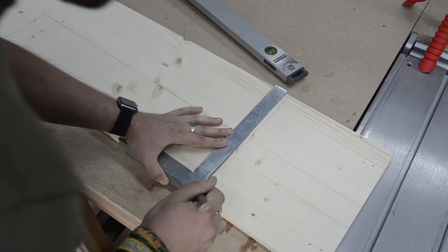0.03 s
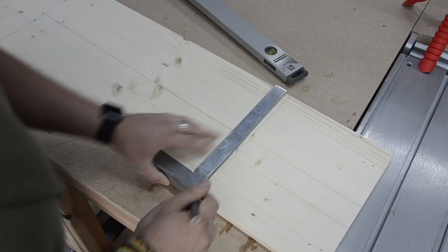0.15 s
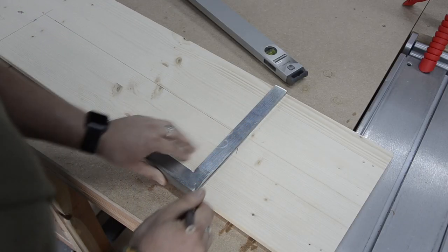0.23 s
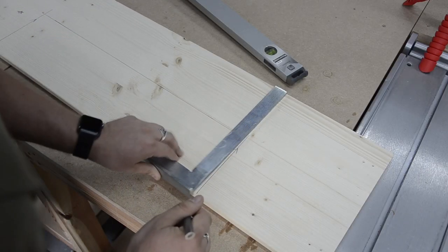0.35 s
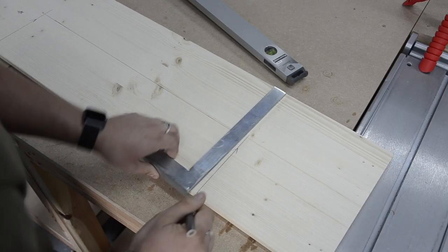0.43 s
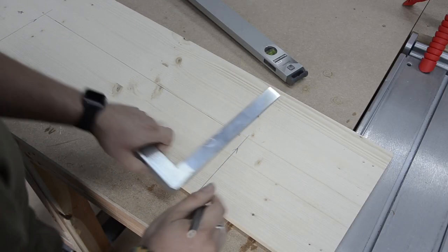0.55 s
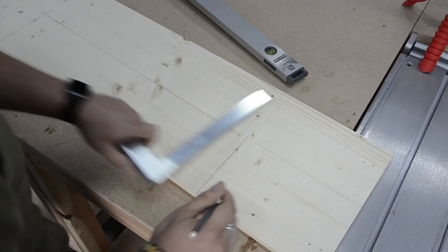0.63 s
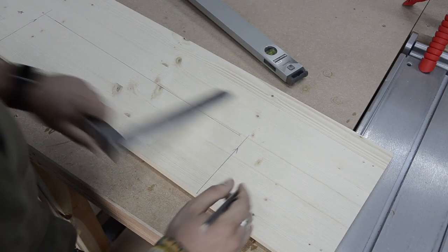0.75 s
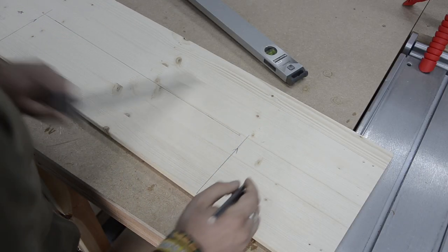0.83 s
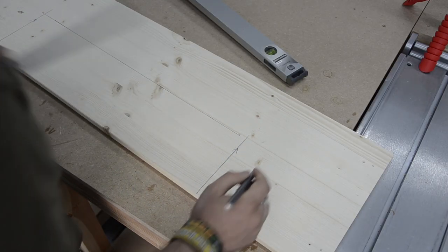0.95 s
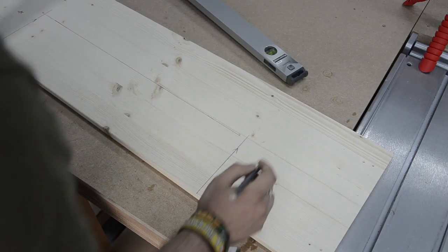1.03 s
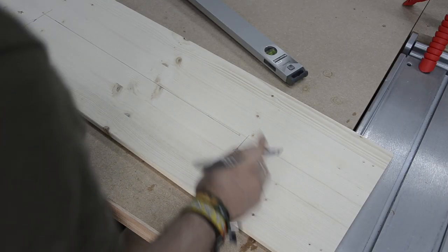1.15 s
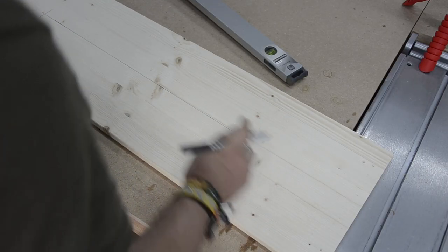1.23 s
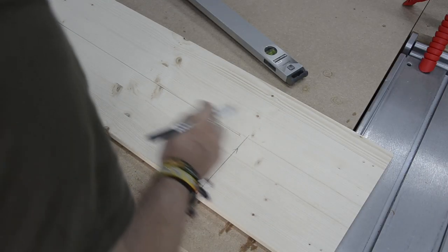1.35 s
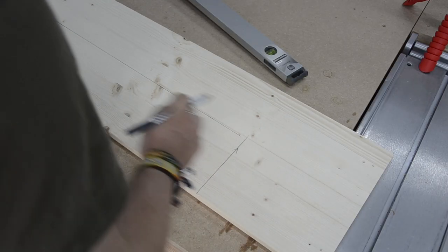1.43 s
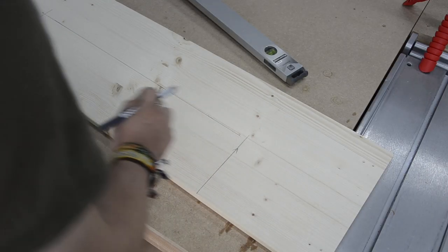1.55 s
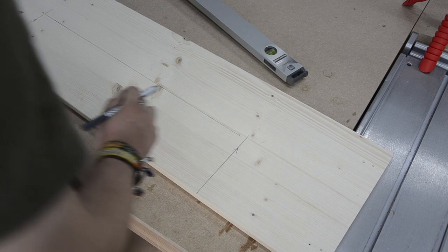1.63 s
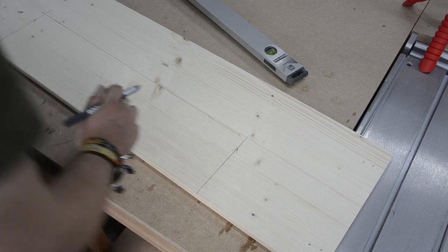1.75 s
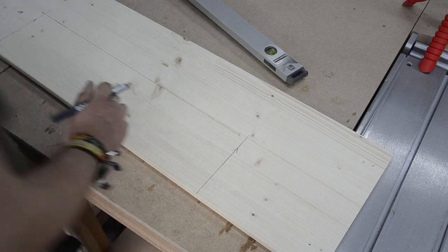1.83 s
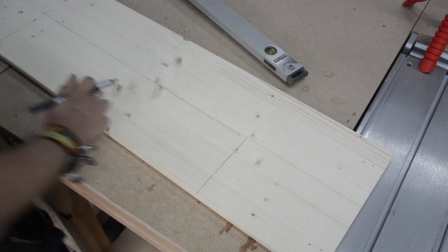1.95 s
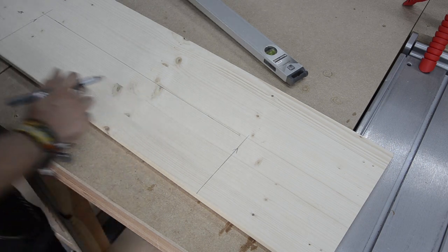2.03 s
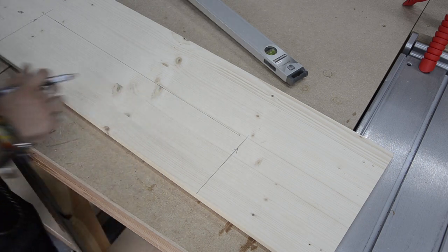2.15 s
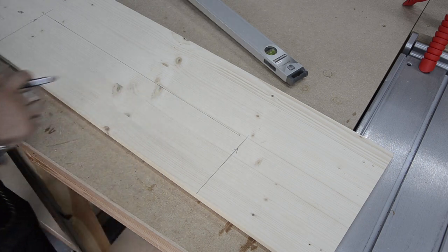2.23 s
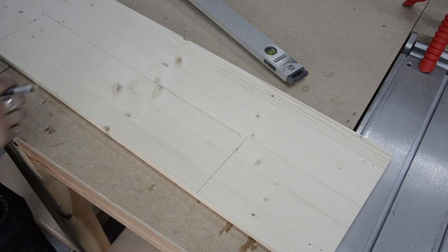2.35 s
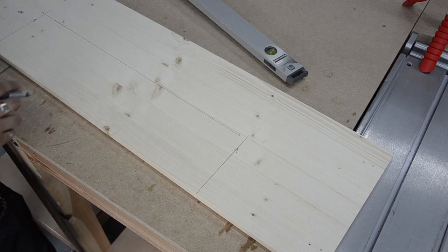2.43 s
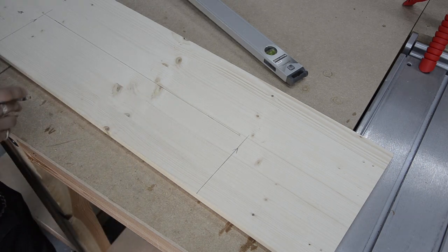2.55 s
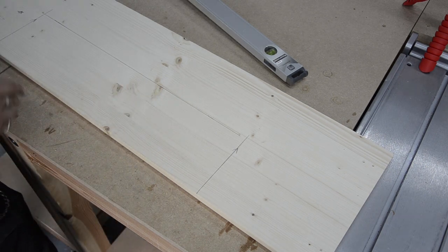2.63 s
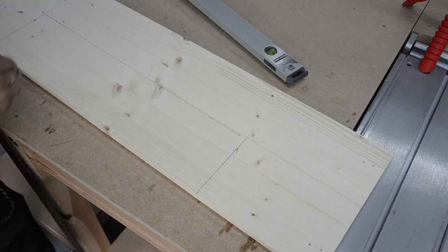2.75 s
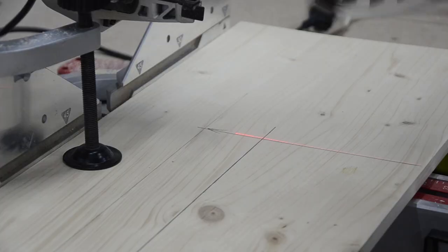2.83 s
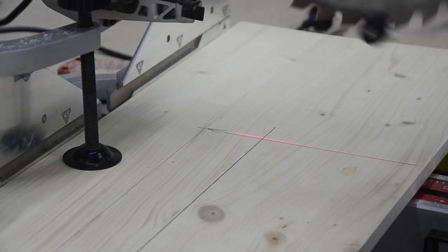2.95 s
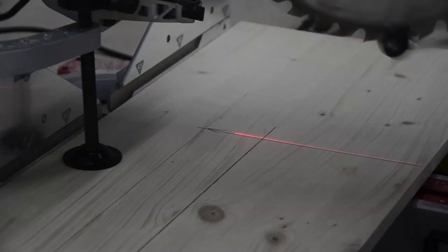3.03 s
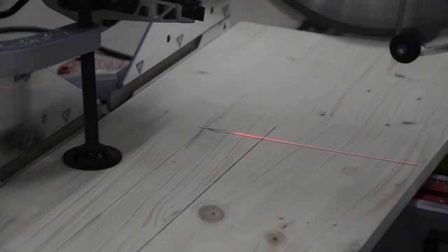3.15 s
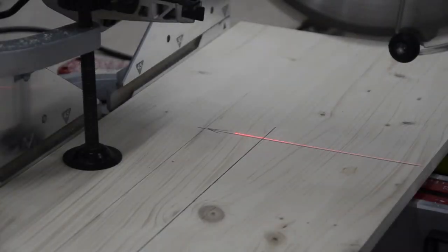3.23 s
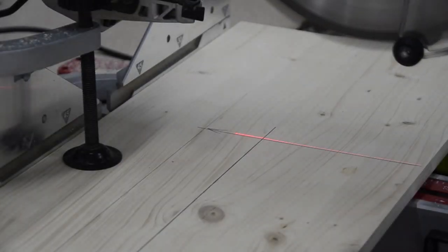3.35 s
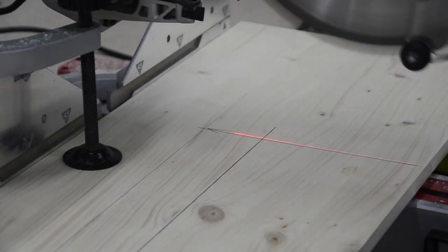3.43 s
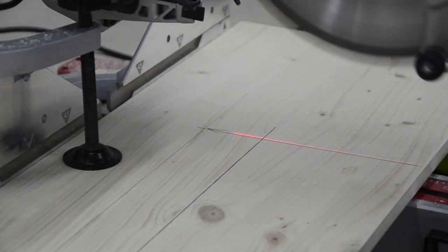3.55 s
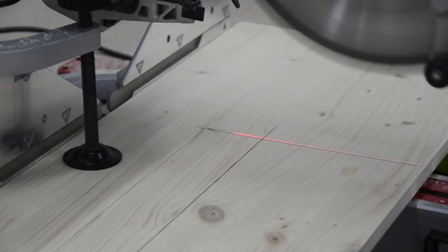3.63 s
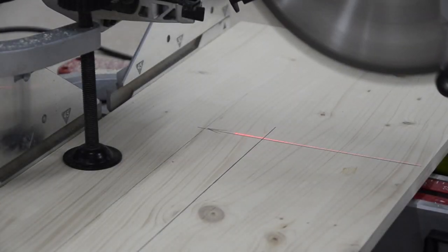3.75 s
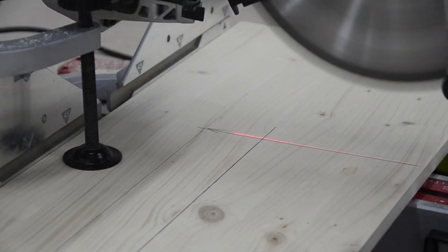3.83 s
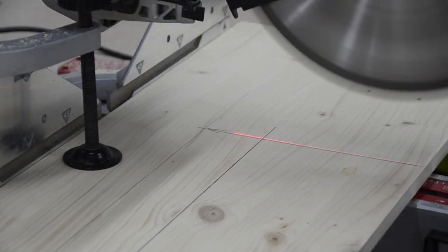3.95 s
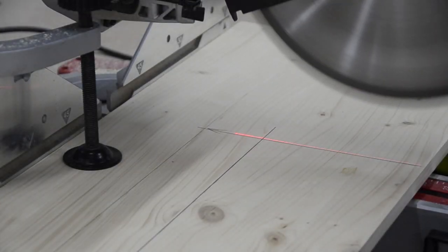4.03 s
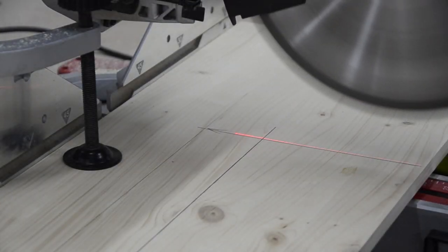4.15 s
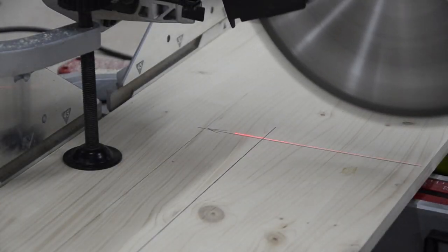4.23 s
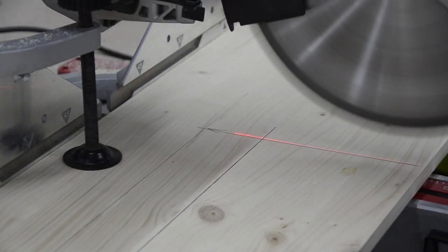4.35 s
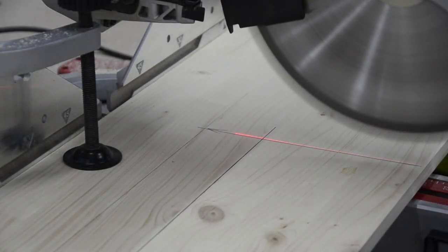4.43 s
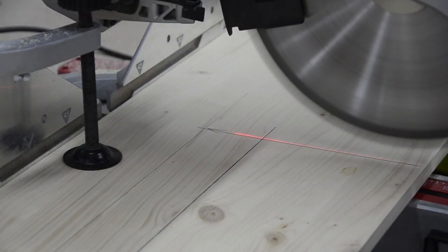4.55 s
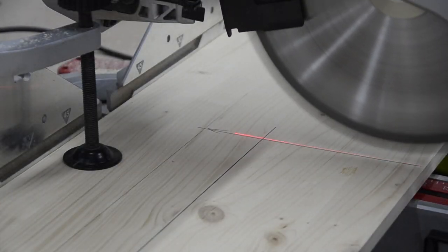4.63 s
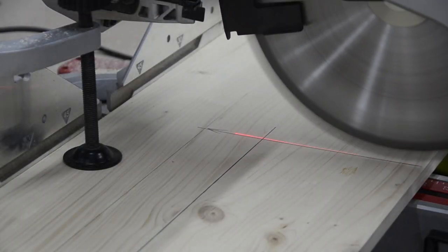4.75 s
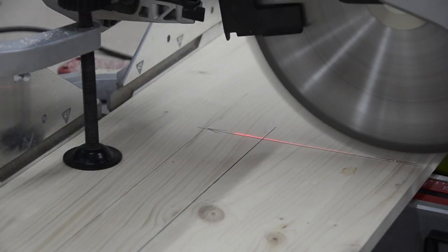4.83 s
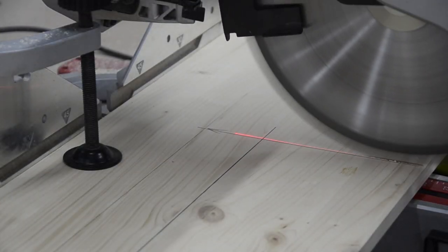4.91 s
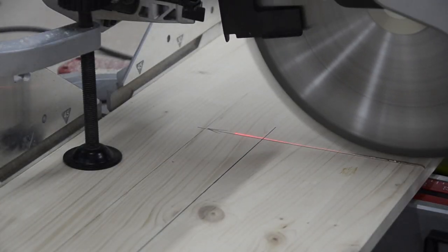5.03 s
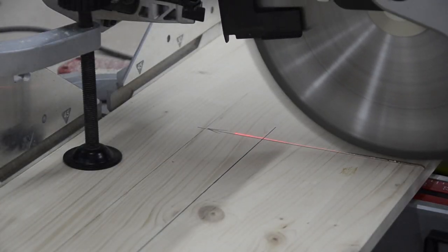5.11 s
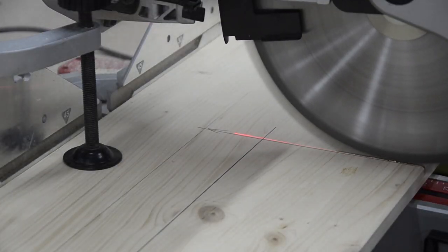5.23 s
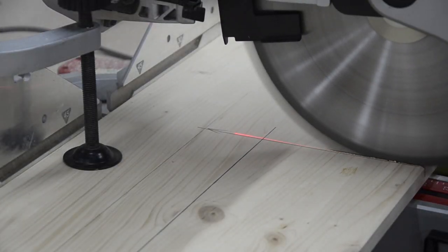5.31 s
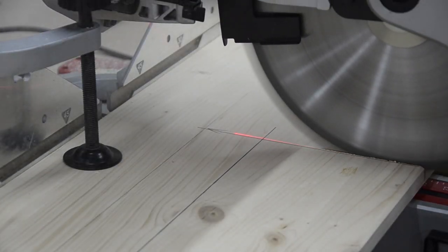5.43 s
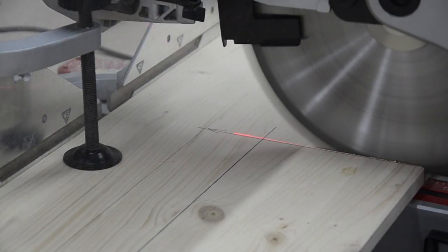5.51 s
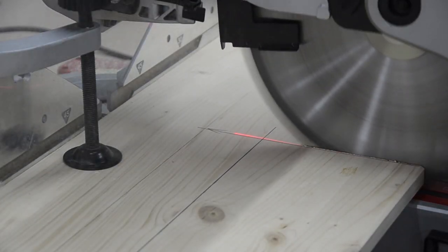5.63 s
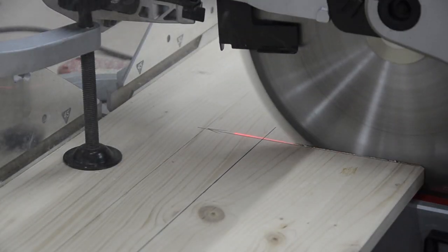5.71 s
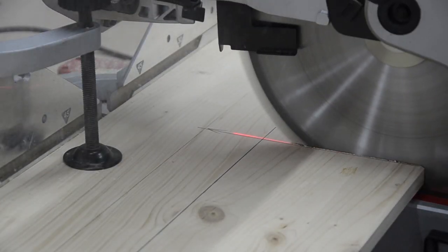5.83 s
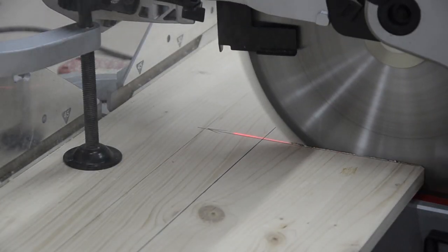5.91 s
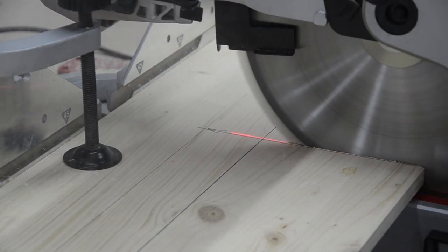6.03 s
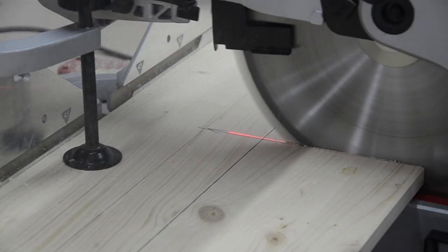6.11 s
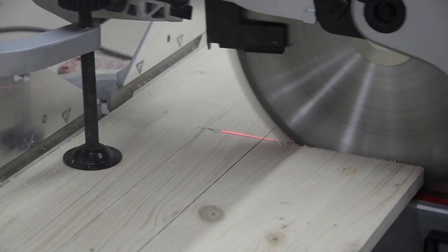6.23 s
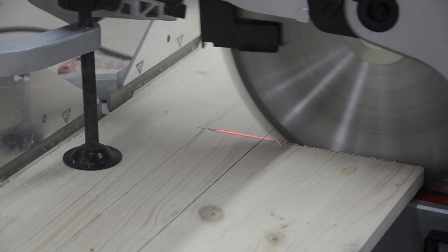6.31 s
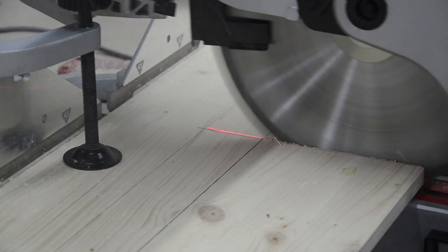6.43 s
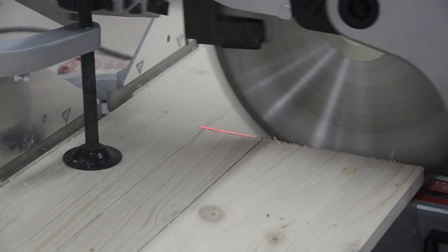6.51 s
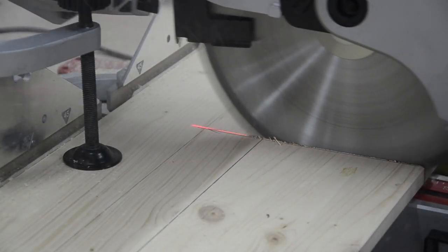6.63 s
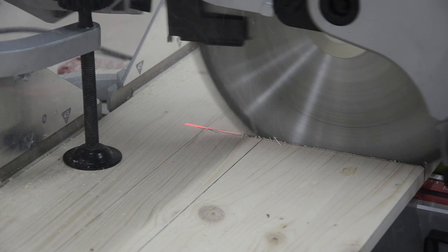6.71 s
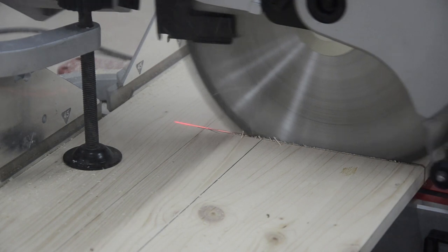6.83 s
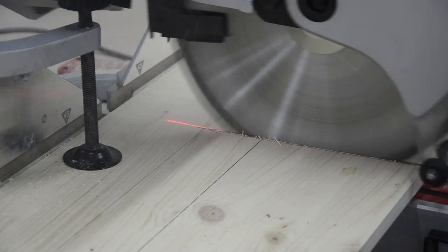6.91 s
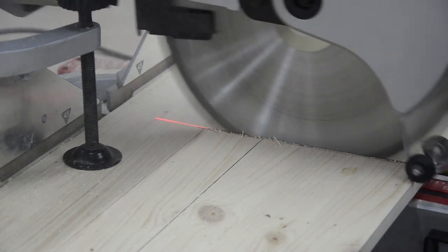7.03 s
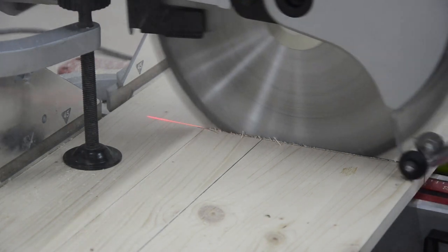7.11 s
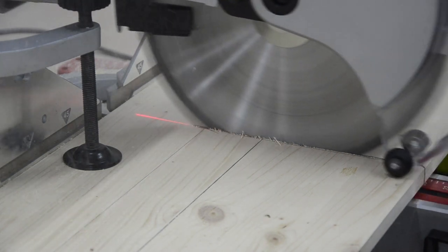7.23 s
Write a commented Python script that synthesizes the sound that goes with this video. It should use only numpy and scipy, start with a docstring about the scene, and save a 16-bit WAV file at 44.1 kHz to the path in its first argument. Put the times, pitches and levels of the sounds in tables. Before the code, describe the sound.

Soft rubbing on wood and a lightly ringing slide of a steel square are followed by several close knocks and clicks on a workbench. Then a miter saw switches on with a clunk, and its rising whine settles into a loud whir of gears and fan. It slows slightly as the teeth tear into a board, droning, whistling and squealing briefly. The microphone is nearby in a small workshop with a short echo.

```python
"""Workbench and miter saw

A hand brushes a wooden board, a steel square slides off it and rings, and things knock down on the bench.
Hard cut to a miter saw: the trigger snaps and the geared motor whines up to speed, all rattle and fan hiss.
The 40-tooth blade is fed through the board and slows a little under the load: the teeth tear out chips
and the wood drones, with short squeals of the blade and flares of the motor's whine."""
import sys
import numpy as np
from scipy import signal
from scipy.fft import rfft, irfft, next_fast_len
from scipy.io import wavfile
from scipy.ndimage import map_coordinates

SR = 44100
rng = np.random.default_rng(int(sys.argv[2]) if len(sys.argv) > 2 else 0)


def master(y):
    """Save y as 16-bit WAV."""
    cut = np.clip(np.atleast_2d(y).T, -1, 1)
    pcm = np.round(cut * 32767)  # scale
    wavfile.write(sys.argv[1], SR, pcm.astype(np.int16))


N = 320607

# Levels in the tables are relative: each layer also has its own gain.
# noise colours of the room, skin on wood, shuffling clothes and steel on wood: f/Hz, level/dB
ROOM_TONE = [(15, -40), (25, -14.5), (65, -9), (157, -7.5), (275, -13), (358, -13), (388, -13.5),
             (563, -16), (644, -17), (1220, -22.5), (1590, -20.5), (3350, -32.5), (5000, -41),
             (13000, -52.5), (14500, -64)]
SKIN = [(800, -1), (3000, 0), (6000, -15), (11000, -14), (15500, -25)]
CLOTH = [(40, -2), (90, 1.5), (280, 0), (450, -17), (1500, -41), (6000, -73.5)]
RUB = [(120, -50), (200, -44), (298, -1.5), (613, -11.5), (1070, -9), (2650, -20), (3350, -29), (6530, -41),
       (7690, -43), (8120, -44), (15000, -47)]
# the workshop's reverb time: f/Hz, t60/s
REVERB_DECAY = [(100, 0.85), (300, 0.44), (1000, 0.37), (2500, 0.4), (6000, 0.3), (14000, 0.043)]
# small sharp clicks: t/s, level/dB, t60/s, low cut/Hz
TICKS = [(0.254, -34, .01, 11000), (1.676, -69, .06, 2500), (2.248, -49, 0.012, 400),
         (2.343, -53, .01, 400), (2.396, -50.5, 0.0072, 403), (2.6261, -23, 0.0045, 400)]
# the square is nudged, then pulled off the board: t/s at full pressure, hold/s, level/dB
STROKES = [(0.386, 0.018, -58.5), (0.696, 0.05, -44)]
# modes of the square, fed in turn as the contact slides: f/Hz, level/dB, t/s at peak, rise/(dB/s)
SQUARE_MODES = [(1087, -47, 0.70, 198), (2296, -58, 0.58, 500), (2310, -51, 0.643, 400),
                (2810, -58, 0.635, 280), (3260, -52.5, 0.72, 380), (3920, -65, 0.74, 200),
                (4960, -73, .55, 300), (5280, -71, 0.67, 200), (7500, -59.5, 0.687, 220),
                (9440, -74, 0.65, 165), (10230, -80, .68, 165), (11500, -79, .68, 165),
                (11940, -79, .69, 165), (13300, -82, .70, 165)]
# blows on the bench: t/s, level/dB, high cut/Hz, ring/dB, thud/dB
KNOCKS = [(0.7105, -37, 1600, -12, -16), (2.246, -20, 1170, 3, -6.5), (2.3444, -22.5, 1196, 5, -10.5),
          (2.391, -16, 1095, -5, -6), (2.4006, -12, 900, -14, -9.5), (2.4083, -20.5, 802, -15, -6.5),
          (2.4198, -22.5, 1410, -13, -15.5), (2.626, -7.5, 6020, -8, -21), (2.6292, -10, 3940, -5.5, -10),
          (2.647, -12.5, 3030, -13.5, -13.5)]
# attack colours of a click, a knock and gears taking up slack: f/Hz, level/dB
CLICK = [(500, -14.5), (2500, 20), (5500, 6), (8000, -9.5), (12000, -12), (15500, -15.5)]
CRACK = [(35, -48), (60, -28), (151, -22.5), (219, -5), (399, -15.5), (469, -2), (744, -6), (938, -3),
         (1050, -4.5), (1360, 1), (1490, -4), (2590, -10.5), (3050, -14), (3340, -18.5), (15000, -88)]
CLUNK = [(100, -26), (400, -18), (650, 10), (900, -4), (1450, 2), (2200, -17), (4000, -16.5), (6000, -30),
         (9500, -30), (15000, -47)]
# modes of the wooden top, the bench frame and the square laid down: f/Hz, level/dB, t60/s
TOP_MODES = [(465, 7, 0.094), (570, -7, 0.088), (845, 3.5, 0.077), (1000, -22.5, .1), (1100, -10.5, 0.14),
             (1256, -14, 0.18), (1500, -17, 0.14), (1740, -11.5, .12), (2300, -19.5, 0.11)]
FRAME_MODES = [(97.8, -18.5, 0.62), (167, -11, 0.18), (223, -1, 0.15), (270, -8, 0.12), (386, -3, 0.11)]
STEEL_MODES = [(2280, -53.5, 0.3), (3290, -57, 0.5), (7510, -76.5, .4)]
# the square touches down: t/s, level/dB
STEEL_TAPS = [(2.247, -4.5), (2.396, 0)]
# blade speed lost to the cut: t/s, loss/(turns/s)
SAG = [(4.95, 0), (5.1, .47), (5.3, 1.67), (5.65, 4.35), (5.78, 4.58), (6.12, 2.8), (6.3, 2.48),
       (6.5, 2.62), (7.27, 4.13)]
# noise colours of the gears, the fan and brushes, and air dragged round by the blade: f/Hz, level/dB
RATTLE = [(60, -60), (150, -35), (300, -15), (470, -15.5), (545, -1), (900, 0.5), (1400, 1), (2200, -5.5),
          (3200, -12), (5000, -64), (9000, -47), (15000, -62)]
HISS = [(200, -20), (600, 4.5), (2000, 5), (3400, 3), (4500, -0.5), (5600, -9.5), (7500, -6), (10000, -12),
        (13000, -21.5), (15500, -38.5)]
DRAUGHT = [(30, -16), (70, -30), (130, -34), (230, -15), (330, -0.5), (470, 4), (560, 9.5), (900, 5),
           (3000, -55)]
# resonances of the gear case, running and starting, and of the motor shell: f/Hz, width/Hz, level/dB
HOUSING_MODES = [(681, 34, 7.5), (1408, 51, 11), (1555, 14, 3.5), (2210, 83, -24)]
GROAN_MODES = [(674, 32, 5), (900, 170, -11), (1420, 230, -6)]
SHELL_MODES = [(570, 38, 4.5), (1200, 53, -4), (1350, 140, 7.5), (1580, 62, 5), (1906, 90, 3),
               (2253, 210, 13.5), (2550, 88, 5), (3550, 230, -2), (4100, 150, 6.5), (4460, 73, 4.5),
               (4640, 26.4, -2)]
# motor whine: multiple of armature speed, running level/dB, starting level/dB,
# blade speed/(turns/s) at which the starting current has eased
WHINE_PARTIALS = [(4.01, -65, -44, 35.6), (4.43, -60, -48, 40), (5.55, -69, -54.5, 45),
                  (5.977, -65, -47, 57), (8.9, -68, -48.5, 35), (10.61, -85, -50, 40.7),
                  (11.9, -56, -48, 23), (12.2, -61, -60.5, 63), (18.23, -62, -79, 47), (20.4, -58, -72, 55),
                  (24, -69, -53, 28), (36, -79, -73, 46.6), (48.5, -77, -76, 55), (73.3, -86, -78.5, 40)]
# the board's drone, throbbing where two lines lie close: multiple of blade speed, level/dB
BOARD_PARTIALS = [(2, -25), (3, -22), (4, -19.5), (4.89, -9.5), (5, -3), (7, -7), (8, -17), (9, -13)]
# the board's bending resonance, reached as the blade slows: f/Hz, width/Hz, level/dB
BENDING_MODE = [(234.7, 4.8, 16)]
# bite of the teeth (the plunge, an easing off, the push through): t/s, level/dB
FEED = [(4.8, -53.5), (4.87, -43), (5.45, -40), (5.75, -36.5), (5.85, -46), (6.35, -48), (6.7, -42),
        (7.27, -39)]
# hum of the saw at speed, growing as it spins up: multiple of blade speed, level/dB
HUM_PARTIALS = [(10, 2.5), (11.67, 6), (13, -0.5), (18, 4), (22, 4), (26, -3), (29, 4), (38, -17), (39, -2),
                (77, -1), (79, -14), (103, -15), (117, -20), (160, -30)]
# once-a-turn hum as the blade presses on the board: t/s, level/dB
IMBALANCE = [(4.4, -77), (4.95, -64), (5.35, -63.5), (5.58, -57), (5.76, -53), (5.93, -66), (6.08, -58),
             (6.35, -66), (6.75, -58.5), (6.95, -61), (7.2, -55)]
# resonances of the saw housing and blade plate, and of the blade's rim: f/Hz, width/Hz, level/dB
PLATE_MODES = [(698, 17, 1.5), (1176, 25, 8), (1328, 25, 3), (1757, 36, 4.5), (1894, 31, 10), (3540, 22, 1)]
RIM_MODES = [(5490, 23, 1.5), (5980, 33, 1.5), (5900, 26, -1), (7050, 280, -4.5), (8250, 170, -13),
             (9530, 46.5, 0), (10200, 92, -7), (11400, 47, -4), (12160, 61, -6.5), (12970, 38, -1.5)]
# noise colours of tearing chips and scraping teeth: f/Hz, level/dB
CHIPS = [(80, -36), (250, -4.5), (450, 2.5), (1200, -0.5), (3500, 4), (5000, -2), (6800, 0.5),
         (10000, -0.5), (13000, -1.5), (14500, -7), (15800, -18)]
RASP = [(250, -27), (400, -6.5), (550, -2.5), (900, -0.5), (1400, -0.5), (2200, 1), (3300, -3.5),
        (4500, -8), (6000, -14), (9000, -17), (13000, -20.5), (15500, -32)]
# whistle at half the tooth rate, the tooth rate and its octave: multiple of blade speed, level/dB
WHISTLE_PARTIALS = [(20, -46.5), (40, -46), (80, -52.5)]
# short squeals of the blade and flares of the motor's whine during the cut:
# t/s, half length/s, multiple of blade speed, level/dB
SQUEALS = [(4.846, .025, 20, -42), (5.08, 0.032, 19, -34), (5.17, 0.037, 19, -34.5), (5.12, 0.055, 20, -52),
           (5.11, .05, 88, -52), (5.266, 0.044, 40, -35.5), (5.28, 0.051, 80, -47),
           (5.513, 0.039, 40, -36.5), (5.54, .025, 58.5, -41), (5.656, .025, 60.5, -41),
           (5.7, 0.027, 20, -36), (5.732, .01, 60.5, -35), (5.77, 0.013, 60.5, -34.5),
           (5.79, 0.03, 20, -43), (5.96, 0.022, 78, -41), (6.026, 0.05, 20, -40), (6.15, .04, 40, -38.5),
           (6.273, 0.029, 40, -38), (6.36, 0.03, 40, -36), (6.48, 0.053, 40, -38), (6.6, 0.044, 20, -49),
           (6.45, 0.061, 78, -45.5), (6.674, 0.093, 78, -42), (6.718, 0.047, 40, -43),
           (6.77, 0.056, 80, -45.5), (6.803, 0.12, 20, -37), (6.88, 0.04, 40, -38), (7.023, 0.03, 40, -45),
           (7.05, .025, 80, -48), (7.096, 0.075, 78, -43.5), (7.22, 0.14, 16.1, -36.5)]

SCENE_CHANGE_S, SWITCH_ON_S, FULL_TORQUE_S = 2.863, 3.078, 3.16
TEETH, GEAR_RATIO = 40, 6.53
TIME = np.arange(N) / SR


def amp(db):
    """Decibels to gain."""
    return 10 ** (np.asarray(db) / 20)


def unit(x):
    """Scaled to rms 1."""
    return x / np.sqrt(np.mean(x ** 2) + 1e-20)


def along(points, hz):
    """A curve over frequency, read on a log axis."""
    f, v = np.transpose(points)
    return np.interp(np.log(hz + 1), np.log(f + 1), v)


def envelope(points):
    """Straight lines between breakpoints in time."""
    return np.interp(TIME, *np.transpose(points))


def ramp(start_s, rise_s):
    """Rises from 0 to 1 and stays there."""
    return np.clip((TIME - start_s) / rise_s, 0, 1)


def swell(s, hold_s, rise_db_per_s, fall_db_per_s):
    """A gain that grows to 1 at time s, holds and dies away."""
    t = TIME - s
    return amp(-rise_db_per_s * np.maximum(-t, 0) - fall_db_per_s * np.maximum(t - hold_s, 0))


def wobble(rate):
    """Smooth random modulation, rate knots a second."""
    return map_coordinates(rng.standard_normal(int(N * rate / SR) + 4), [TIME * rate])


def butter(x, order, hz, kind):
    """x through a Butterworth filter."""
    return signal.sosfilt(signal.butter(order, hz, kind, fs=SR, output="sos"), x)


def filtered(x, response):
    """x shaped by a frequency response."""
    size = next_fast_len(len(x) + 8192)
    return irfft(rfft(x, size) * response(np.fft.rfftfreq(size, 1 / SR)), size)[:len(x)]


def coloured(x, spectrum):
    """Minimum-phase EQ, which keeps attacks sharp."""
    size = 4096
    cepstrum = irfft(np.log(amp(along(spectrum, np.fft.rfftfreq(size, 1 / SR)))))
    cepstrum[1:size // 2] *= 2
    cepstrum[size // 2 + 1:] = 0
    return signal.fftconvolve(x, irfft(np.exp(rfft(cepstrum))))[:len(x)]


def resonate(x, modes):
    """x through a bank of resonances."""
    return filtered(x, lambda f: sum(amp(db) * 1j * f * width / (hz * hz - f * f + 1j * f * width)
                                     for hz, width, db in modes))


def noise(spectrum):
    """Coloured noise of rms 1."""
    return unit(filtered(rng.standard_normal(N), lambda hz: amp(along(spectrum, hz))))


def singing(modes):
    """Resonances kept ringing by noise, rms 1."""
    return unit(resonate(rng.standard_normal(N), modes))


def tone(cycles, rough, flutter_rate):
    """A tone of rms 1 whose strength and phase flutter."""
    angle = 2 * np.pi * cycles
    carrier = (1 + rough * wobble(flutter_rate)) * np.sin(angle)
    return unit(carrier + rough * wobble(flutter_rate) * np.cos(angle))


def partials(rows, turns):
    """Wavering sines that track the blade's speed."""
    return sum(amp(db + 4.7 * wobble(5)) * np.sin(2 * np.pi * k * turns + 0.35 * wobble(7))
               for k, db in rows)


def burst(t60):
    """Half a second of dying white noise."""
    t = TIME[:SR // 2]
    return rng.standard_normal(len(t)) * amp(-60 * t / t60)


def struck(modes):
    """Half a second of dying modes, balanced a little differently on each hit."""
    t = TIME[:SR // 2]
    return sum(amp(db + rng.normal(0, 0.97) - 60 * t / t60) * np.sin(2 * np.pi * hz * t)
               for hz, db, t60 in modes)


def add(track, s, sound):
    """Mix a sound into the track at time s."""
    part = track[round(s * SR):][:len(sound)]
    part += sound[:len(part)]


def room(x, wet_db):
    """x with workshop reverb; each frequency dies at its own speed."""
    hz, t, bands = signal.stft(rng.standard_normal(SR * 2 // 3), SR, nperseg=256)
    tail = signal.istft(bands * amp(-60 * t / along(REVERB_DECAY, hz)[:, None]), SR, nperseg=256)[1]
    tail = np.pad(tail / np.linalg.norm(tail), (SR // 250, 0))  # 4 ms pre-delay
    return x + amp(wet_db) * signal.fftconvolve(x, tail)[:len(x)]


def handling():
    """A hand brushes over the board; clothes shuffle as the worker turns away."""
    hand = amp(-67.5) * swell(.23, hold_s=0.14, rise_db_per_s=55, fall_db_per_s=34.5) * noise(SKIN)
    clothes = amp(-54.5) * swell(0.72, hold_s=0.13, rise_db_per_s=41, fall_db_per_s=9.5) * noise(CLOTH)
    return hand + clothes


def ticks():
    """Small sharp clicks: bright snaps of noise with the lows cut away."""
    out = np.zeros(N)
    for s, db, t60, low_cut_hz in TICKS:
        click = coloured(butter(burst(t60), 2, low_cut_hz, "highpass"), CLICK)
        add(out, s, amp(db) * room(click, wet_db=-6.5))
    return out


def square_slide():
    """Steel grips the wood unevenly; each mode of the thin blade swells as it is fed, then rings on."""
    pressure = sum(amp(db) * swell(s, hold_s, rise_db_per_s=80, fall_db_per_s=180)
                   for s, hold_s, db in STROKES)
    grit = rng.standard_normal(N) * amp(3 * wobble(600))
    out = room(pressure * unit(coloured(grit, RUB)), wet_db=-10)
    for hz, db, s, rise in SQUARE_MODES:
        gain = amp(db) * swell(s, hold_s=0.026, rise_db_per_s=rise, fall_db_per_s=276)
        out += gain * tone(hz * TIME, rough=0.76, flutter_rate=170)
    return out


def knocks():
    """Blows crack, ring the top and shake the frame, duller when soft; the square rings as it lands."""
    out = np.zeros(N)
    for s, db, high_cut_hz, ring_db, thud_db in KNOCKS:
        crack = amp(13) * coloured(burst(t60=0.048), CRACK)
        ring = amp(ring_db - 13) * struck(TOP_MODES)
        thud = amp(thud_db - 9.5) * struck(FRAME_MODES)
        blow = butter(crack + ring + thud, 2, [110, high_cut_hz], "bandpass")
        add(out, s, amp(db) * room(blow, wet_db=-6))
    for s, db in STEEL_TAPS:
        add(out, s, amp(db) * struck(STEEL_MODES))
    return out


def switch():
    """The trigger snaps and the gears take up their slack."""
    out = np.zeros(N)
    add(out, 3.0755, amp(-24) * coloured(burst(t60=0.035), CLUNK))
    add(out, 3.0805, amp(-14.5) * coloured(burst(t60=0.083), CLUNK))
    return room(out, wet_db=-9)


def blade_speed():
    """Turns a second: a kick, an exponential climb towards top speed, less what the cut takes."""
    kick_speed, free_speed = 12.2, 62.9
    kick_s, spin_up_s = .025, .528
    t = np.maximum(TIME - SWITCH_ON_S, 0)
    climb = free_speed - (free_speed - kick_speed) * np.exp(-t / spin_up_s)
    return climb * (1 - np.exp(-t / kick_s)) - envelope(SAG)


def motor(speed, turns, cutting):
    """Gears rattle and grind, brushes spark, the fan hisses; a soft start, then full torque."""
    share = speed / speed.max()
    torque = amp(-8.5 * (1 - ramp(FULL_TORQUE_S, 0.035)))
    starting_current = np.clip((56 - speed) / 21, 0, 1)
    damping = amp(-2.5 * cutting)
    armature_pulse = 1 + 0.21 * np.sin(2 * np.pi * GEAR_RATIO * turns)
    rattle = amp(-31 + 0.18 * wobble(8.8)) * share ** 0.34 * unit(noise(RATTLE) * armature_pulse)
    grind = amp(-42.5) * singing(HOUSING_MODES)
    groan = amp(-38.5) * starting_current * singing(GROAN_MODES)
    gear_case = butter(grind + groan, 3, [500, 4500], "bandpass")
    fan = amp(-33.5 - 0.49 * np.maximum(55.6 - speed, 0)) * noise(HISS)  # full from 55.6 turns/s
    air = damping * fan + amp(-44.5) * share ** 4 * noise(DRAUGHT)
    sparks = amp(-54) * noise(HISS)
    whine_gain = damping * amp(-9 * (1 - ramp(FULL_TORQUE_S, 0.085)))
    return torque * (damping * rattle + gear_case + sparks) + air + whine_gain * whine(speed, turns)


def whine(speed, turns):
    """Armature partials, rough with brush chatter, flare as they sweep through the shell's resonances."""
    out = 0
    swing = 1 + .9 * np.sin(2 * np.pi * turns)  # the gear wheel is slightly off centre
    for k, running_db, starting_db, eased_speed in WHINE_PARTIALS:
        starting_current = np.clip((eased_speed - speed) / 11.8, 0, 1)
        cycles = k * GEAR_RATIO * turns
        line = swing * tone(cycles, rough=.8, flutter_rate=90)
        chatter = (0.21 + .5 * starting_current) * tone(cycles, rough=3, flutter_rate=260)
        db = running_db + starting_current * (starting_db - running_db) + 2.4 * wobble(14)
        out += amp(db) * (line + chatter)
    out = butter(out, 6, 490, "highpass")
    return room(out + resonate(out, SHELL_MODES), wet_db=-1.5)


def blade_ring(turns, feed_db):
    """The saw hums and the blade's plate and rim sing; the rim follows the feed."""
    hum = amp(-46.5) * partials(HUM_PARTIALS, turns)
    plate = amp(-39.5 + 3 * wobble(5.7)) * singing(PLATE_MODES)
    rim = amp(feed_db - 3 + 2.9 * wobble(12)) * singing(RIM_MODES)
    imbalance = amp(envelope(IMBALANCE)) * unit(np.sin(2 * np.pi * turns))
    return hum + plate + rim + imbalance


def board_drone(turns, cutting, feed_db):
    """The board drones, and chatters ever harder until the skimming teeth break through its face."""
    idle_db, pressed_db = -55.5, -47 + 0.27 * np.clip(feed_db + 41, -5, 2)
    steady = amp(idle_db + cutting * (pressed_db - idle_db))
    chatter = amp(-40.5) * swell(5.43, hold_s=0.033, rise_db_per_s=36, fall_db_per_s=202)
    drone = (steady + chatter) * partials(BOARD_PARTIALS, turns)
    return drone + resonate(drone, BENDING_MODE)


def chips(turns, runout, feed_db):
    """Unequal teeth strike the wood and tear out chips, in a pattern that repeats each turn."""
    tooth = np.floor(turns * TEETH).astype(int)
    bite = 0.4 + rng.standard_normal(TEETH)
    strikes = np.diff(tooth, prepend=0) * bite[tooth % TEETH]
    tearing = unit(strikes * rng.standard_normal(N)) + 0.67 * unit(strikes)
    gain = amp(feed_db - 6.5 + 1.8 * wobble(30))
    return room(gain * unit(coloured(tearing * runout, CHIPS)), wet_db=4)


def rasp(turns, runout, cutting):
    """Each tooth scrapes in its own way: a rough loop, one turn long, drifts as the grain passes."""
    size, drift = 640, 0.37
    loop = lambda: map_coordinates(rng.standard_normal(size), [turns * size % size], mode="grid-wrap")
    scrape = loop() + drift * (wobble(4) * loop() + wobble(4) * loop())
    return amp(-38.5 + 2 * wobble(13)) * cutting * unit(runout * coloured(scrape, RASP))


def whistle(turns, cutting):
    """The teeth whistle through the cut, with short blade squeals and flares of the motor's whine."""
    line = lambda k: tone(k * turns, rough=.35, flutter_rate=80)
    steady = sum(amp(db + 1.1 * wobble(11)) * line(k) for k, db in WHISTLE_PARTIALS)
    squeals = sum(amp(db) * np.exp(-.5 * ((TIME - s) / half_s) ** 2) * line(k)
                  for s, half_s, k, db in SQUEALS)
    return cutting * steady + squeals


def blade(speed, turns, cutting):
    """All the layers of blade and board; a slow blade radiates almost nothing."""
    feed_db = envelope(FEED)
    runout = 1 + 0.26 * np.sin(2 * np.pi * turns) + 0.23 * np.sin(2 * np.pi * 2 * turns)
    body = blade_ring(turns, feed_db) + board_drone(turns, cutting, feed_db)
    teeth = chips(turns, runout, feed_db) + rasp(turns, runout, cutting) + whistle(turns, cutting)
    return (speed / speed.max()) ** 6 * (body + teeth)


def scene():
    """First the bench, then a hard cut to the saw over quieter room tone."""
    bench = amp(-56.5) * noise(ROOM_TONE) + handling() + ticks() + square_slide() + knocks()
    speed = blade_speed()
    turns = np.cumsum(speed) / SR
    cutting = ramp(start_s=4.47, rise_s=0.53)  # from first graze to teeth fully in the wood
    running = ramp(SWITCH_ON_S, .007) * (motor(speed, turns, cutting) + blade(speed, turns, cutting))
    saw = switch() + running + amp(-72) * noise(ROOM_TONE)
    return np.where(TIME < SCENE_CHANGE_S, bench, saw)[None]


def record(dry):
    """Master chain: cut the deepest bass, round off the highest peaks, remove the very top."""
    ceiling, top_hz = .8, 15800
    thinned = butter(dry[0], 4, 40, "highpass")
    rounded = thinned / (1 + (thinned / ceiling) ** 4) ** .25
    return filtered(rounded, lambda hz: hz < top_hz)[None]


dry = scene()
out = record(dry)
master(out)
```